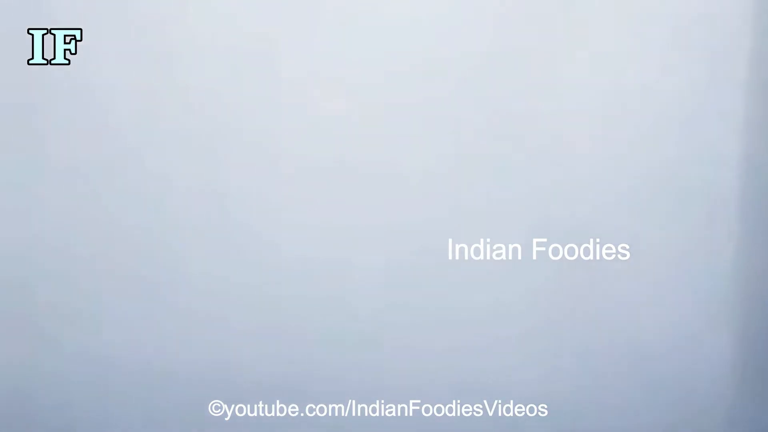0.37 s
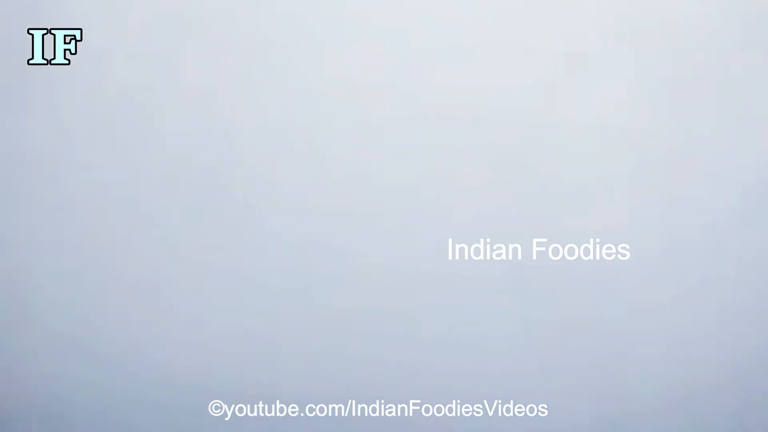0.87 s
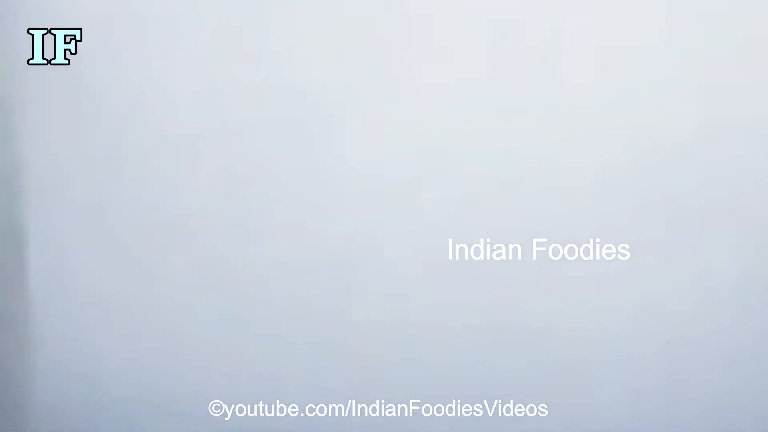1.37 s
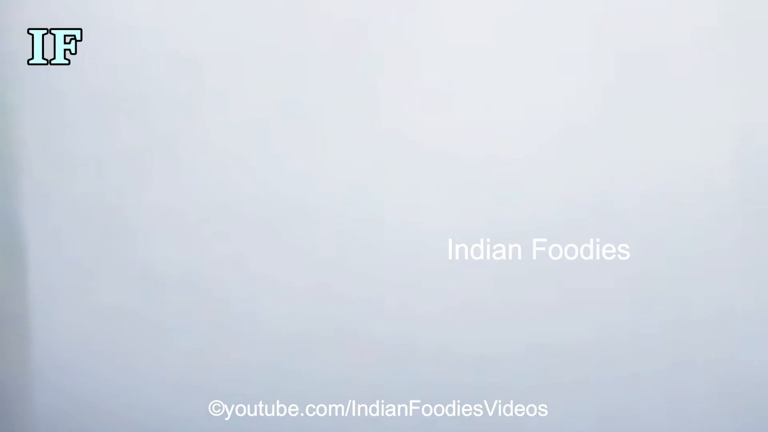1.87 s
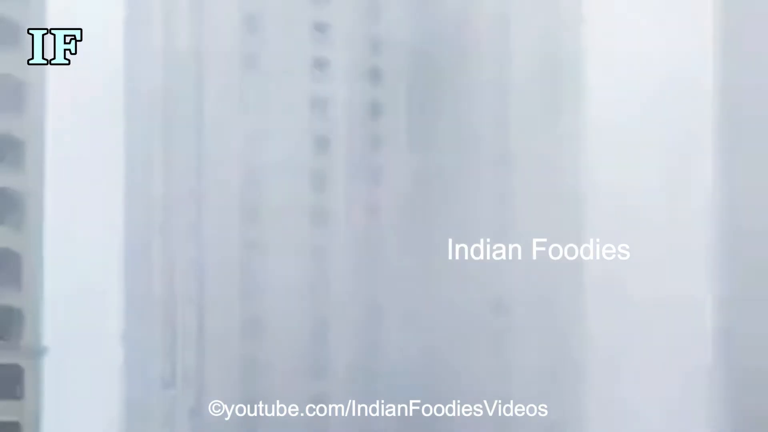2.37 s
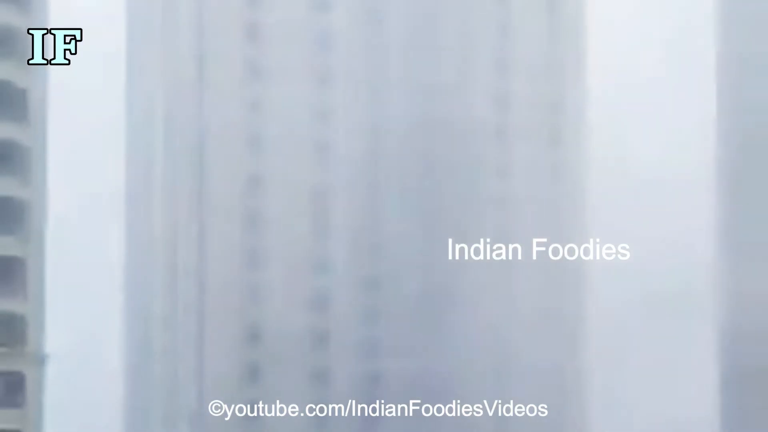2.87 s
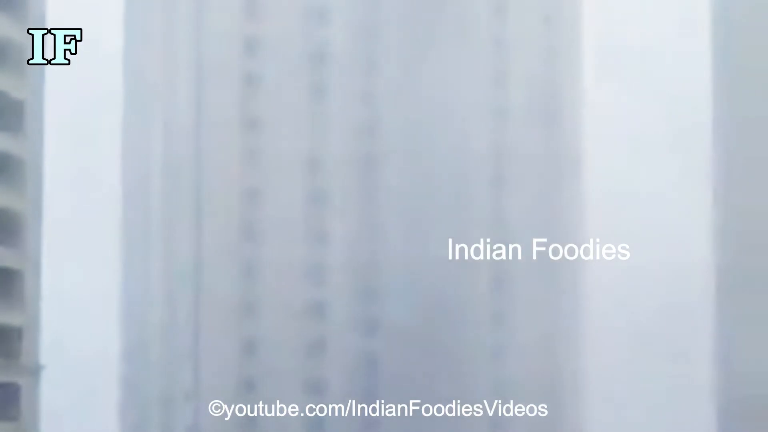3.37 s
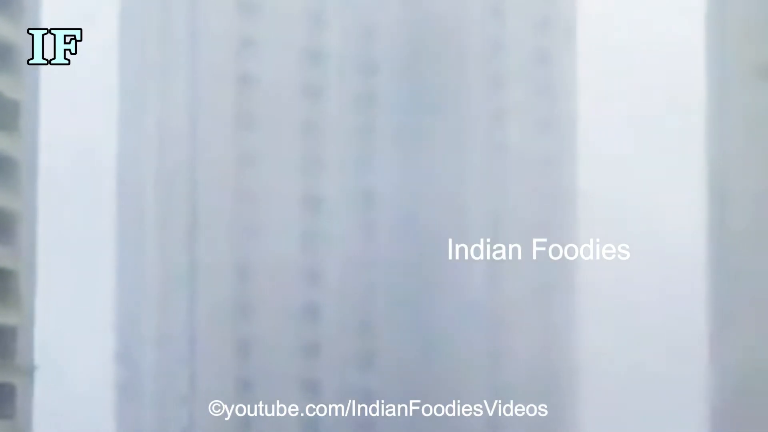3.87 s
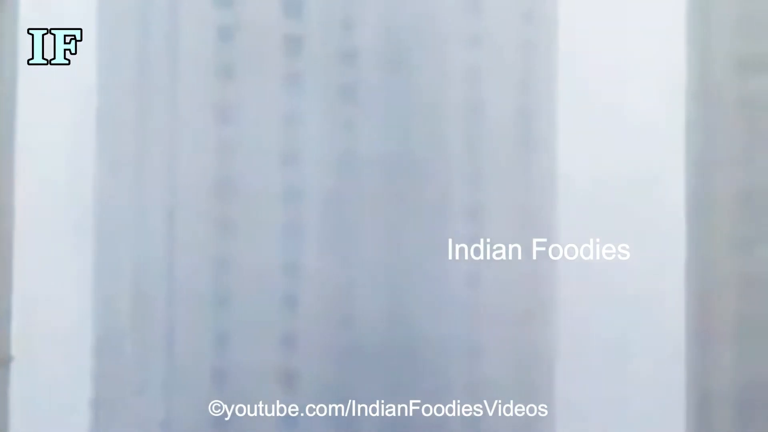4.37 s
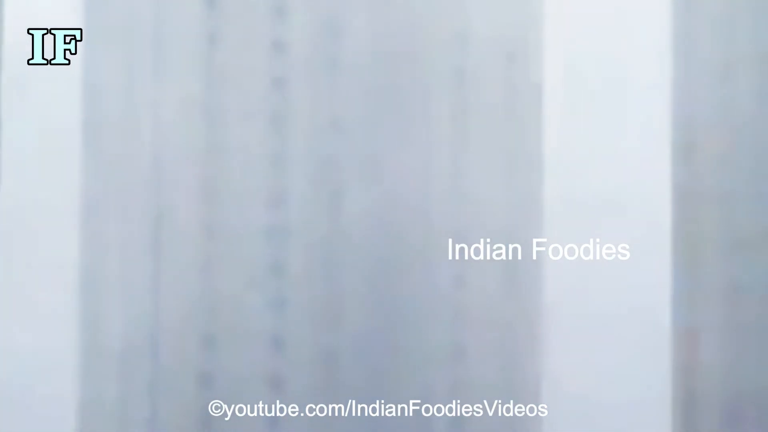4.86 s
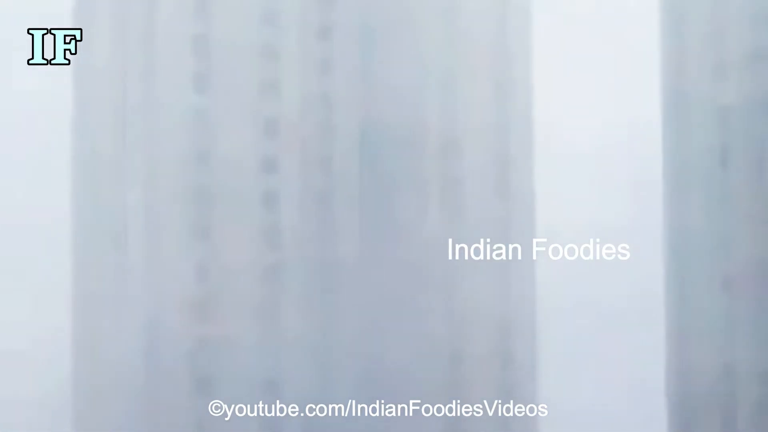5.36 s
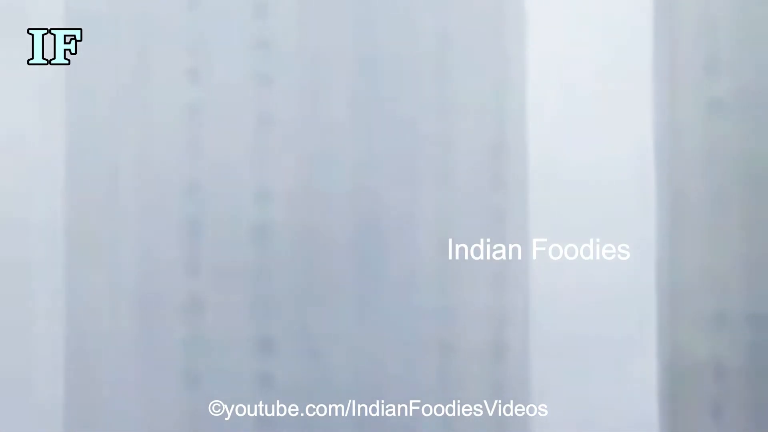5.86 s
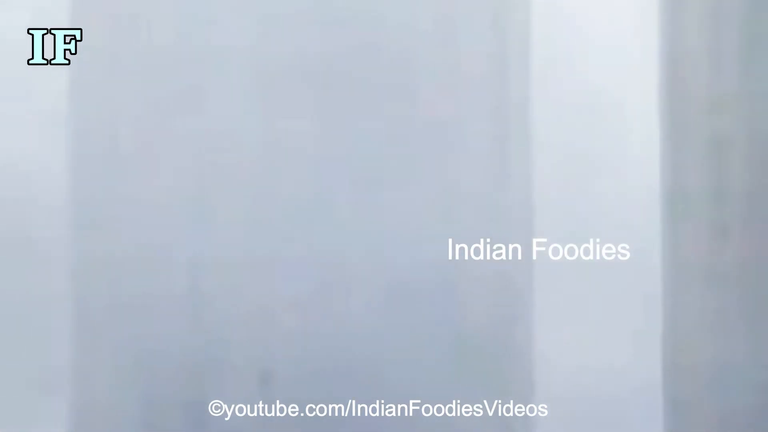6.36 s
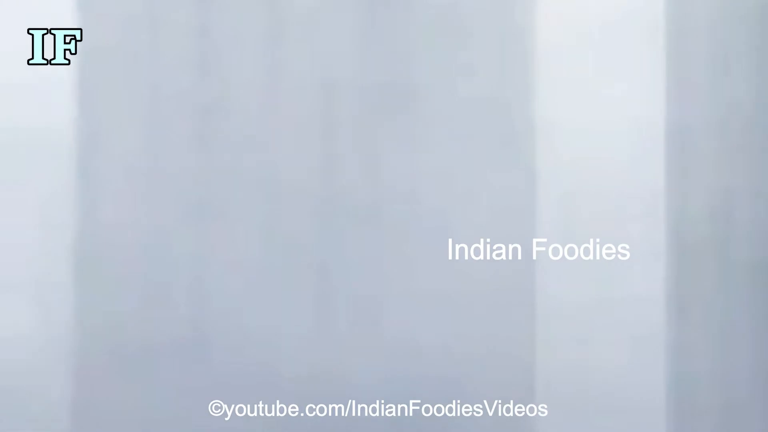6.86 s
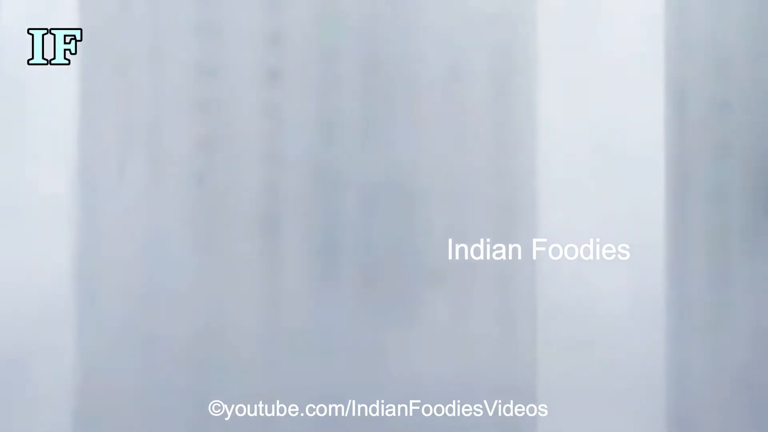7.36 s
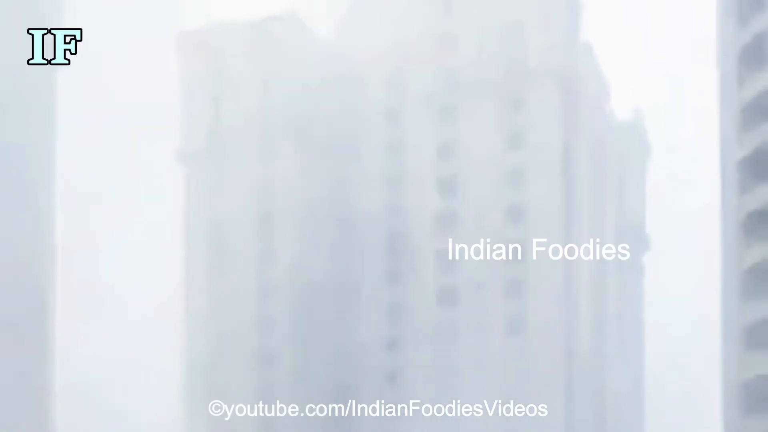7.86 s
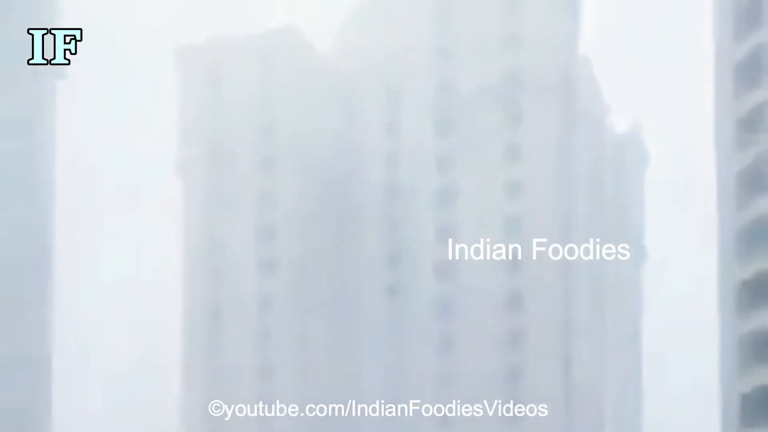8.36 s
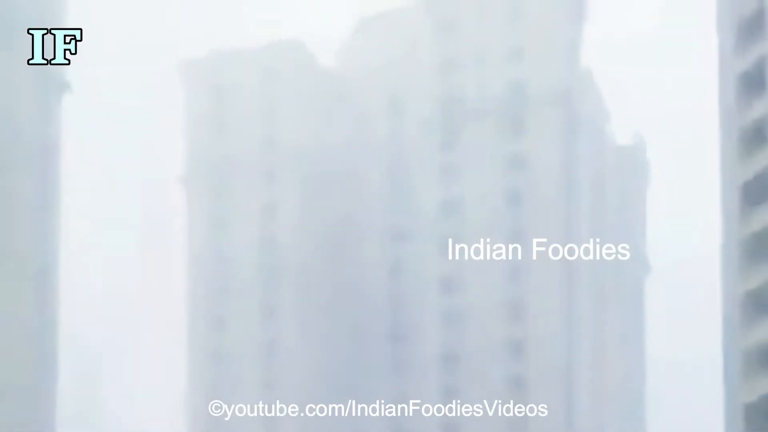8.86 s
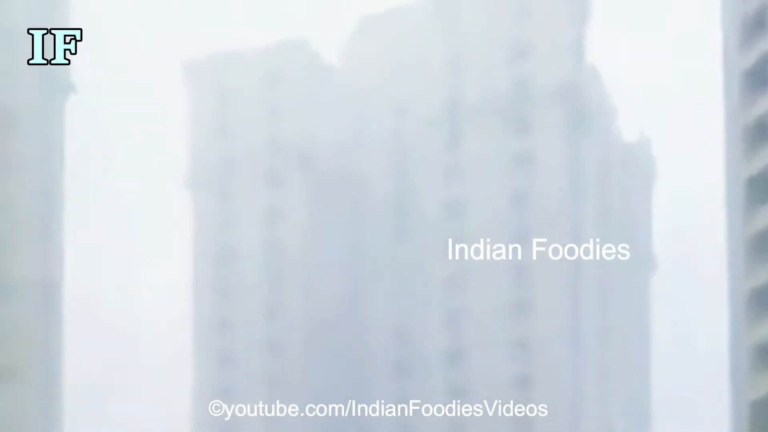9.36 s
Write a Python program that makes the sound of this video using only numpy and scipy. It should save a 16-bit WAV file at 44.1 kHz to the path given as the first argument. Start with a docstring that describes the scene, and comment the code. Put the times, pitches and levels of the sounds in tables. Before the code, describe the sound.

Very heavy rain pours between misty high-rise towers, heard from a high window through a small, slightly lossy microphone. A dense roar, hissing spray, pattering ledge drops and wind rumble run steadily, then cut to silence. The rain fades up quickly with a faint wavering whistle, cuts out again, and finally restarts the same way.

```python
"""Very heavy rain between tall buildings, heard from a high window through a small microphone.
First stretch: far roar and nearer spray of band-shaped noise, drops ringing ledge modes, wind rumble.
Silence, then a second stretch: a quiet opening fades up, and sine tones whistle thinly at the window.
After another silence the second stretch starts over. Narrow treble bands flicker throughout."""
import sys
import numpy as np
from scipy import signal
from scipy.fft import rfft, irfft, next_fast_len
from scipy.io import wavfile
from scipy.ndimage import uniform_filter1d

SR = 44100
rng = np.random.default_rng(int(sys.argv[2]) if len(sys.argv) > 2 else 0)


def volts_from_decibels(level):
    """Turn decibel levels (scalar or array-like) into linear amplitude factors."""
    exponent = np.asarray(level, float) / 20
    return 10 ** exponent


def unload_wav(signal):
    """Save mono or channel-first audio to the path in sys.argv[1] as 16-bit WAV at rate SR, clipped to [-1, 1]."""
    wavfile.write(
        sys.argv[1],
        SR,
        np.round(np.clip(np.atleast_2d(signal).T, -1, 1) * 32767).astype(np.int16),
    )


N = 418068

# colour of rumble and roar in each stretch: hz, relative_level_db
FIRST_LOW_COLOUR = [(12, -50), (20, -17), (48, -6), (103, -11.5), (144, -4), (210, -2), (264, 3.5),
                    (464, -1.5), (786, -3.5), (1800, -12), (2340, -27.5), (3960, -120)]
SECOND_LOW_COLOUR = [(12, -50.5), (20, -13), (40, -9), (57, -5.5), (70, -6.5), (87, -5), (112, -10),
                     (126, -15.5), (140, -5), (155, -3.5), (185, -2), (270, -2), (360, 0), (480, -2.5),
                     (639, -2), (1040, -6.5), (1260, -6), (1800, -11.5), (2340, -30), (3960, -120)]
# colour of the spray in each stretch: hz, relative_level_db
FIRST_SPRAY_COLOUR = [(1590, -33), (2700, -1), (3250, -1), (3910, -2.5), (4190, -3.5), (4500, -4),
                      (5040, -2), (5690, 1.5), (7400, -5), (12400, -8), (16100, -41), (22000, -120)]
SECOND_SPRAY_COLOUR = [(1590, -31), (2700, 0.5), (3530, -1), (3830, -1.5), (4170, -3), (4560, -1.5),
                       (5210, -0.5), (6230, 0), (7260, -2.5), (7440, -2.5), (12400, -6.5), (16100, -38),
                       (22000, -120)]
# resonances of the microphone port: centre_hz, width_hz, lift_db
PORT_RESONANCES = [(1280, 16, -1), (2082, 198, 12), (2530, 360, -3), (3770, 180, 2), (4410, 330, 3.5),
                   (5130, 190, -5.5)]
# ledge modes: mode_hz, base_level_db, t60_s, low_shift_share, high_shift_share
LEDGE_MODES = [(620, -10, .03, 0, 0), (1255, -2, .05, 1, 0), (1400, -7, .03, -1, 0), (1680, -6, .02, 0, -1),
               (1990, -1, .05, 0, 1), (2070, -6, .045, 0, 1), (2135, 0, .045, 0, 1), (3860, -13, .04, 0, 0),
               (4560, -12, .035, 0, 0)]
# drops move along the ledge and favour some modes: time_s, low_shift_db, high_shift_db
LEDGE_SHIFTS = [(0.0, -3, 0), (0.9, -4, 0), (1.2, -4, 2), (2.25, -2, 1), (2.7, -1, 2), (3.5, 0, 2),
                (3.9, 3, 3), (4.6, 3, 3), (4.9, -1, 3), (5.6, 1, -1), (6.2, -1, -1), (6.7, 2, -2),
                (7.4, 3, -4), (7.68, 0, -5)]
# strength of the storm: time_s, rumble_db, roar_db, spray_db
STORM_LEVELS = [(0.0, -31.5, -25.5, -37), (0.27, -28, -22.5, -34), (0.9, -28, -22.5, -35),
                (1.7, -27.5, -21.5, -35), (1.97, -30, -23.5, -35), (2.25, -28.5, -23, -36),
                (2.6, -32, -23.5, -32.5), (2.68, -27, -24.5, -32.5), (2.88, -26.5, -23, -30),
                (3.05, -28, -23, -33.5), (3.7, -27.5, -22.5, -33), (3.9, -26, -22, -32.5),
                (4.4, -25.5, -22.5, -32.5), (4.7, -28.5, -24, -34.5), (4.92, -28.5, -22, -33),
                (5.75, -26.5, -22.5, -33), (5.9, -28, -22.5, -30.5), (6.55, -27.5, -22, -31.5),
                (7.4, -28.5, -21.5, -30.5), (7.68, -25.5, -21.5, -30.5)]
# spells of the whistle: start_s, length_s, start_pitch_hz, glide_hz_per_s, waver_hz, level_db
WHISTLE_SPELLS = [(2.68, .32, 4720, -300, 140, -46.5), (3.0, .72, 4520, 120, 140, -46),
                  (3.3, .5, 6290, -40, 25, -52), (3.78, .4, 6240, 40, 22, -48),
                  (4.17, .48, 6250, 10, 9, -42), (4.68, .55, 6285, 0, 14, -49.5),
                  (5.3, .55, 6270, 60, 16, -47), (5.8, .16, 7060, 150, 14, -44),
                  (5.92, .3, 7060, -100, 14, -50), (6.16, .27, 7025, -40, 12, -43.5),
                  (6.42, .5, 7090, 30, 16, -46), (6.9, .55, 7075, -30, 18, -47.5),
                  (7.62, .1, 7020, 0, 12, -43)]
# narrow bands that drop out: low_hz, high_hz, share_of_time_0_to_1, depth_db
FLICKER_BANDS = [(2380, 2480, .06, -20), (2500, 2610, .1, -25), (2600, 2720, .2, -30),
                 (2710, 2830, .17, -30), (2820, 3000, .07, -22), (3150, 3300, .03, -20),
                 (5000, 5200, .06, -20), (11600, 11900, .04, -20)]
# silence of the thin strips at the top edge: strip_low_hz, share_of_time_0_to_1
FRAY_SHARES = [(12100, .08), (12600, .35), (12900, .7), (13400, .86), (13700, .96), (14000, .99)]

FRAY_LOW_HZ, FRAY_HIGH_HZ, FRAY_STRIP_HZ = 12100, 14000, 110
WHISTLE_SWELL_S, WHISTLE_FLUTTER_DB = .04, 3.8
FIRST_END_S, SECOND_START_S, SECOND_END_S, AGAIN_S = 2.2925, 2.586, 7.679, 7.986
FADE_FROM_DB, FADE_S = -18, .175
# brief dip, timed from the opening of the second stretch
DIP_START_S, DIP_END_S, DIP_DB = .0122, .0215, -34


def rms_one(x):
    """Scales to rms 1."""
    return x / np.sqrt(np.mean(x ** 2) + 1e-20)


def in_time(rows):
    """Interpolates table columns to one value a sample."""
    time_s, *columns = np.transpose(rows)
    return [np.interp(np.arange(N) / SR, time_s, column) for column in columns]


def drift(corner_hz, steady_s=None):
    """Twice low-passed noise, rms 1; steady_s takes out the moving average over that time."""
    step = 40  # samples between slow values
    pole = np.exp(-2 * np.pi * corner_hz * step / SR)
    noise = rng.standard_normal(N // step + 2002)
    slow = signal.lfilter([1], [1, -2 * pole, pole * pole], noise)[2000:]
    if steady_s:
        slow = slow - uniform_filter1d(slow, size=round(steady_s * SR / step))
    return np.interp(np.arange(N) / step, np.arange(len(slow)), rms_one(slow))


def sheet(colour, low_hz, high_hz, count, gust_db, patch_db):
    """Noise in overlapping log-spaced bands, each swelling and sagging partly alone; rms 1."""
    size = next_fast_len(N)
    hz = np.maximum(np.arange(size // 2 + 1) * SR / size, 1)
    colour_hz, colour_db = np.transpose(colour)
    shape_db = np.interp(np.log(hz), np.log(colour_hz), colour_db)
    for centre_hz, width_hz, lift_db in PORT_RESONANCES:
        shape_db = shape_db + lift_db / (1 + (2 * (hz - centre_hz) / width_hz) ** 2)
    coloured = rfft(rng.standard_normal(size)) * volts_from_decibels(shape_db)
    place = (count + 1) * np.log(hz / low_hz) / np.log(high_hz / low_hz)
    gust = drift(11.0, steady_s=0.66)
    neighbour = drift(11)
    out = 0
    for k in range(1, count + 1):
        own = drift(17.0, steady_s=0.56)
        triangle = np.clip(1 - np.abs(place - k), 0, 1)
        band = irfft(coloured * triangle, size)[:N]
        out = out + band * volts_from_decibels(gust_db * gust + patch_db * (own + 0.11 * neighbour))
        neighbour = own
    return rms_one(out)


def end_low(colour):
    """Colour of rumble and roar, with the end points that close it above the port resonance."""
    end_db = colour[-2][1]
    return colour[:-1] + [(2250, end_db - 3), (2700, end_db - 13)]


def roar(low_colour):
    """Countless far drops blur into noise that varies band by band."""
    return sheet(end_low(low_colour), 154.7, 2950, count=26, gust_db=0.68, patch_db=1.83)


def spray(colour):
    """Nearer water hisses: treble noise in many narrow, uneven bands."""
    bottom = [(2300, colour[1][1])]
    top = [(13800, colour[-3][1] - 6)]
    return sheet(bottom + colour[1:-2] + top, 2320, 15500, count=64, gust_db=0.68, patch_db=2.5)


def drops(per_s, spread_db):
    """Clicks of either sign at random moments, many small and few large."""
    sizes = volts_from_decibels(spread_db * np.minimum(rng.exponential(1, N), 5))
    signs = rng.choice([-1, 1], N)
    return sizes * signs * (rng.random(N) < per_s / SR)


def ledge():
    """Single drops strike the ledge, each waking its decaying modes unevenly; rms 1."""
    hits = drops(600, spread_db=1.8)
    low_shift_db, high_shift_db = in_time(LEDGE_SHIFTS)
    out = 0
    for mode_hz, level_db, t60_s, low_share, high_share in LEDGE_MODES:
        radius = volts_from_decibels(-60 / (t60_s * SR))
        angle = 2 * np.pi * mode_hz / SR
        shift_db = low_share * low_shift_db + high_share * high_shift_db
        uneven_db = 3 * rng.standard_normal(N) + 2.2 * drift(12)
        struck = hits * volts_from_decibels(level_db + shift_db + uneven_db) + 1e-18
        poles = [1, -2 * radius * np.cos(angle), radius * radius]
        out = out + signal.lfilter([0, np.sin(angle)], poles, struck)
    return rms_one(signal.sosfilt(signal.butter(2, 300, "high", fs=SR, output="sos"), out))


def whistle():
    """Wind in a window gap: sine spells, wavering in pitch and fluttering in level."""
    t = np.arange(N) / SR
    waver = 2 * np.pi * np.cumsum(drift(16)) / SR
    out = 0
    for start_s, length_s, pitch_hz, glide_hz_per_s, waver_hz, level_db in WHISTLE_SPELLS:
        since_s = t - start_s
        sounding = np.clip(np.minimum(since_s, length_s - since_s) / WHISTLE_SWELL_S, 0, 1)
        phase = 2 * np.pi * (pitch_hz + glide_hz_per_s * since_s / 2) * since_s + waver_hz * waver
        out = out + volts_from_decibels(level_db) * sounding * np.sin(phase)
    return np.sqrt(2) * out * volts_from_decibels(WHISTLE_FLUTTER_DB * drift(25))


def rumble(low_colour):
    """Wind rumble: low noise in a few broad bands, swelling and sagging."""
    return sheet(end_low(low_colour), 10.8, 230.0, count=4, gust_db=-0.94, patch_db=1.2)


def storm(low_colour, spray_colour):
    """Sums roar, ledge drops, spray and rumble; the ledge follows the level of the roar."""
    rumble_db, roar_db, spray_db = in_time(STORM_LEVELS)
    out = volts_from_decibels(roar_db) * (roar(low_colour) + volts_from_decibels(-9.5) * ledge())
    out = out + volts_from_decibels(spray_db) * spray(spray_colour)
    return out + volts_from_decibels(rumble_db) * rumble(low_colour)


def flicker(x):
    """Narrow treble bands drop out for moments, the topmost strips most of the time."""
    size = next_fast_len(N)
    spectrum = rfft(x, size)
    hz = np.arange(size // 2 + 1) * SR / size
    strips = []
    for low_hz in range(FRAY_LOW_HZ, FRAY_HIGH_HZ, FRAY_STRIP_HZ):
        share = np.interp(low_hz, *np.transpose(FRAY_SHARES))
        strips.append((low_hz, low_hz + FRAY_STRIP_HZ, share, -60))
    edge = drift(8.0)  # shared by the strips
    for low_hz, high_hz, share, depth_db in FLICKER_BANDS + strips:
        mask = np.clip(np.minimum(hz - low_hz, high_hz - hz) / 30 + .5, 0, 1)
        band = irfft(spectrum * mask, size)[:N]
        chance = drift(8.3) + (low_hz >= FRAY_LOW_HZ) * .45 * edge
        is_off = chance < np.quantile(chance, share)
        off = uniform_filter1d(1. * is_off, size=700)
        x = x - band * off * (1 - volts_from_decibels(depth_db))
    return x


def scene():
    """Two stretches in turn, the whistle in the second only."""
    first = storm(FIRST_LOW_COLOUR, FIRST_SPRAY_COLOUR)
    second = storm(SECOND_LOW_COLOUR, SECOND_SPRAY_COLOUR) + whistle()
    in_first = np.arange(N) / SR < SECOND_START_S - .1  # the join lies in the silence
    return flicker(np.where(in_first, first, second))[None]


def top_cut(x):
    """Nothing passes above the cut-off."""
    return signal.sosfilt(signal.butter(12, 13810, fs=SR, output="sos"), x)


def record(dry):
    """Hard cuts to silence, fade and brief dip at the second opening, then its start again."""
    t = np.arange(N) / SR
    opened_s = t - SECOND_START_S
    gate = (t < FIRST_END_S) | ((opened_s >= 0) & (t < SECOND_END_S))
    fade_up = np.interp(opened_s, [0, FADE_S], [volts_from_decibels(FADE_FROM_DB), 1])
    fade = np.where(opened_s < 0, 1, fade_up)
    dip = np.where((opened_s > DIP_START_S) & (opened_s < DIP_END_S), volts_from_decibels(DIP_DB), 1)
    mix = dry * gate * fade * dip
    start, again = round(SECOND_START_S * SR), round(AGAIN_S * SR)
    mix[:, again:] = mix[:, start:start + N - again]
    return top_cut(mix)


dry = scene()
out = record(dry)
unload_wav(out)
```